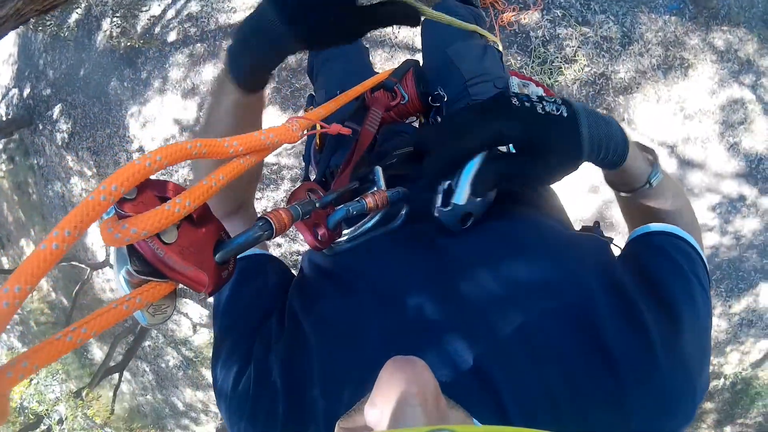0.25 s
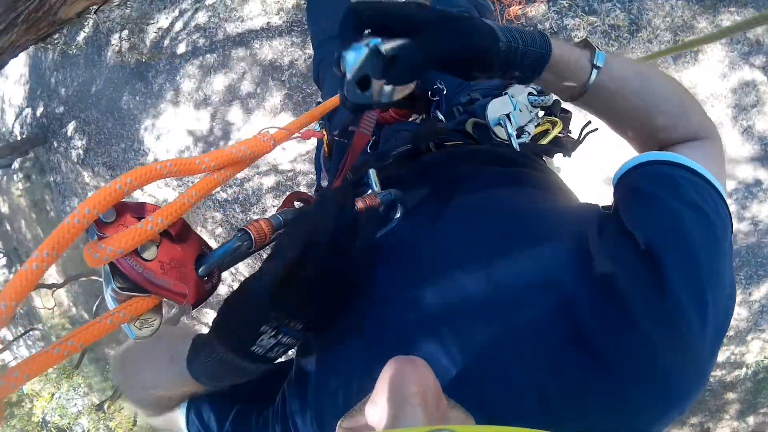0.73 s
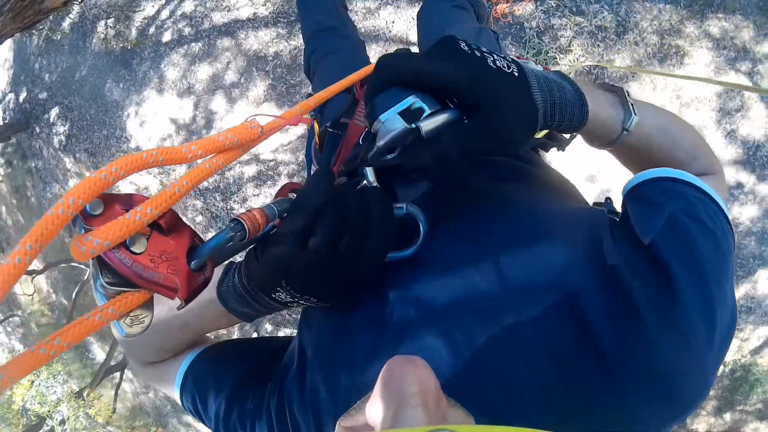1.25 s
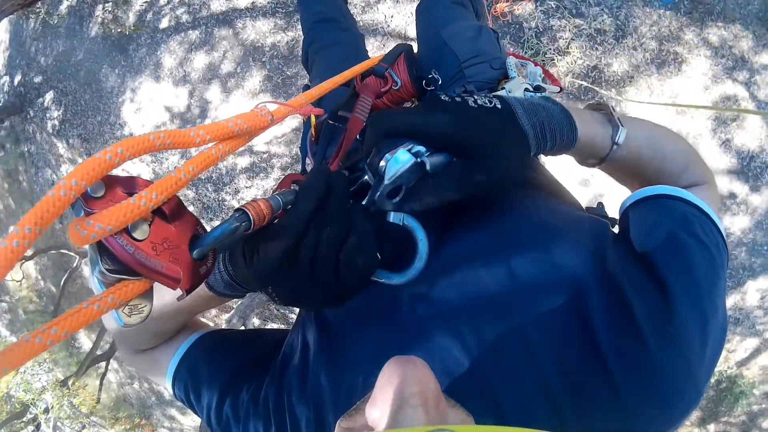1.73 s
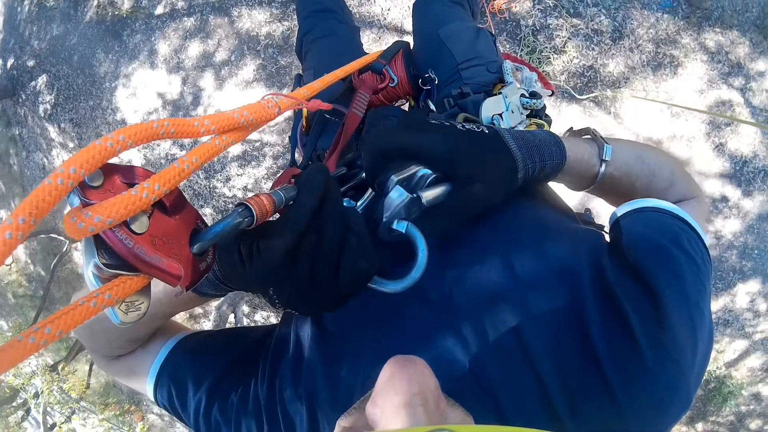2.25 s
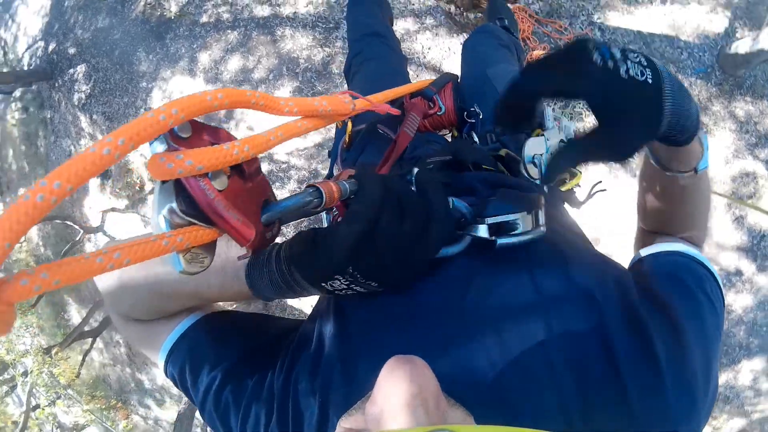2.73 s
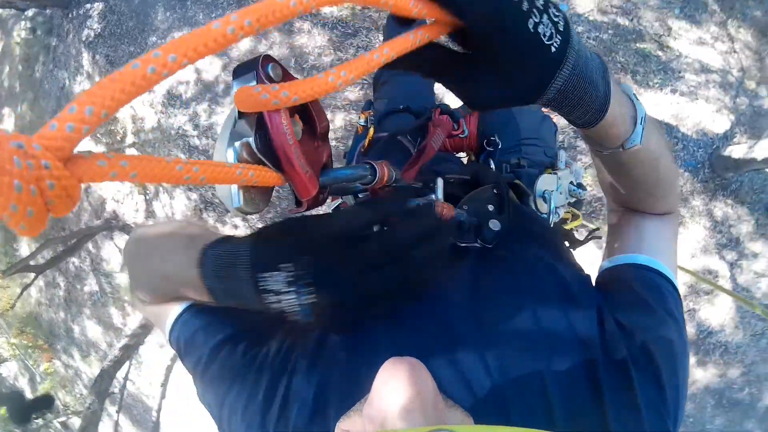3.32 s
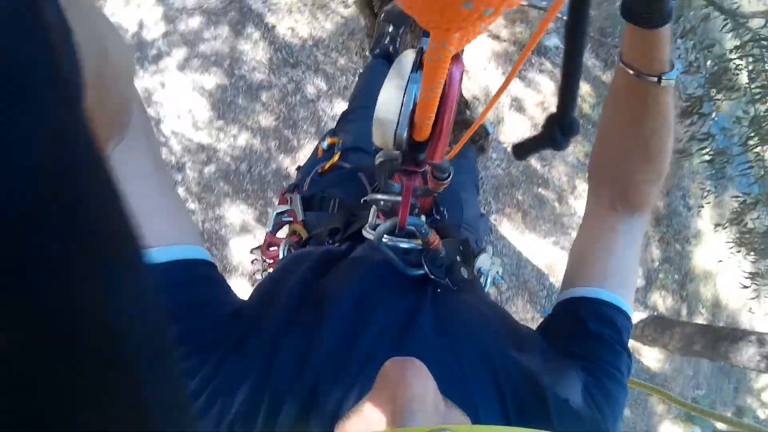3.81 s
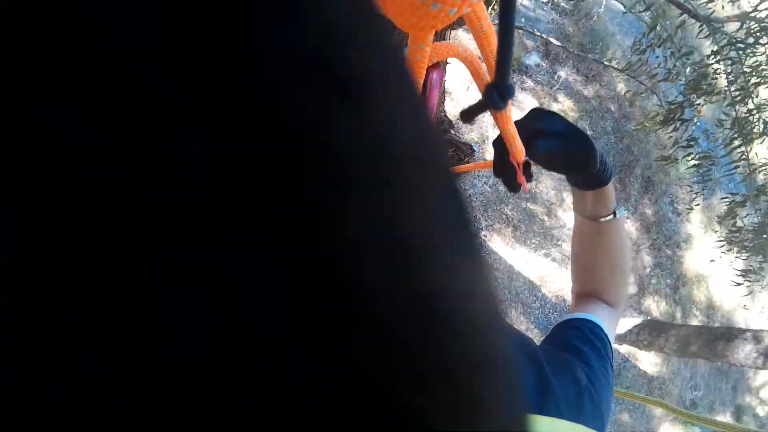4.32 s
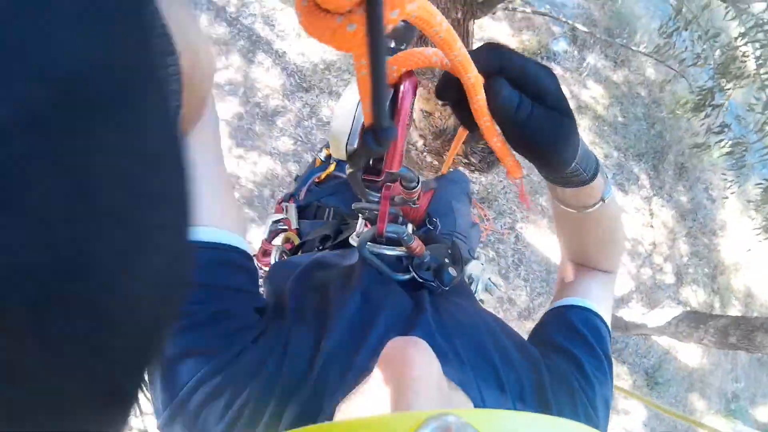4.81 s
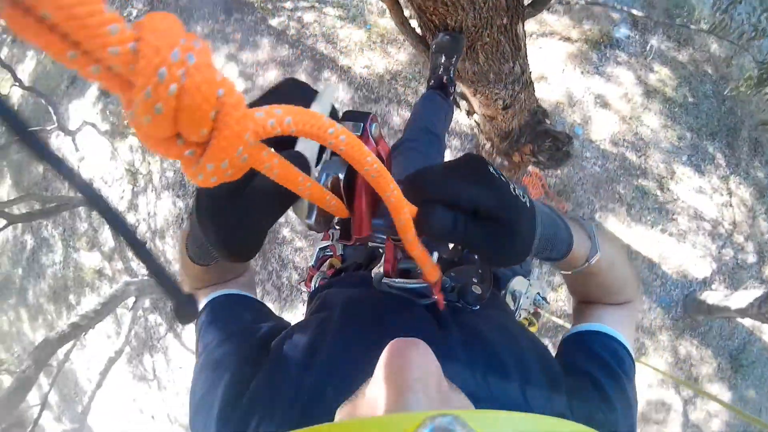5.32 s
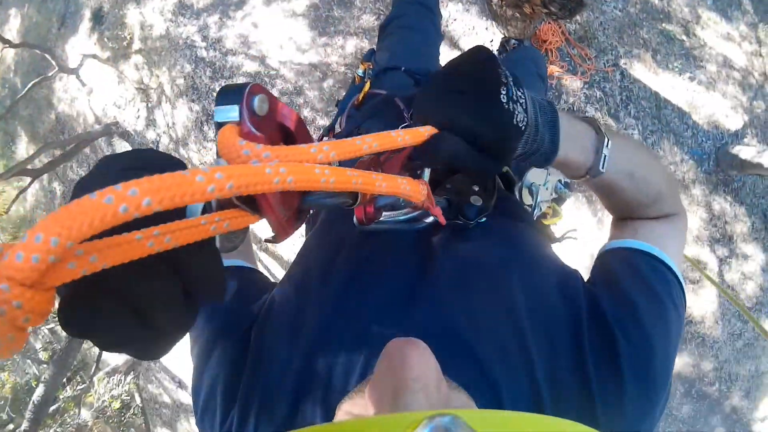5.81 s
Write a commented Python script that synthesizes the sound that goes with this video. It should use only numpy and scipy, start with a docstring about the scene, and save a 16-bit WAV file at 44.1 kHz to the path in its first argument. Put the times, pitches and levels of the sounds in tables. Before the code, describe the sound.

Close, dry carabiner clicks grow into padded clunks, with cloth scraping, one loud rope slap on the helmet, then quiet outdoor air.

```python
"""Still air and microphone hiss run throughout, under a faint rustle of rope and gloves and scattered metal
knocks and ticks: a climber in a tree handles carabiners and a descender on the harness.
The microphone sits on the helmet; rope slaps the helmet twice, and a sleeve rubs along it in three strokes.
Blows, jolts and chimes are decaying sine modes; rub and rustle are coloured fibre slips; air is coloured noise."""
import sys
import numpy as np
from scipy import signal
from scipy.fft import rfft, irfft, next_fast_len
from scipy.io import wavfile
from scipy.ndimage import uniform_filter1d

SR = 44100
rng = np.random.default_rng(int(sys.argv[2]) if len(sys.argv) > 2 else 0)


def dump_mix(stems):
    """Bounce the given channels to the path in sys.argv[1] as a 16-bit WAV at rate SR."""
    frames = np.atleast_2d(stems).T  # one column per channel
    limited = np.clip(frames, -1, 1)  # hard clip at full scale
    pcm = np.round(limited * 32767).astype(np.int16)
    wavfile.write(sys.argv[1], SR, pcm)


N = 267102


def from_db(db):
    """Decibels to amplitude gain."""
    return 10 ** (np.asarray(db) / 20)


def rms_one(x):
    """Scales to rms 1."""
    return x / np.sqrt(np.mean(x ** 2) + 1e-20)


def in_time(spans):
    """Interpolates dB columns to smoothed gains along time, silent where no span is running."""
    gains = np.zeros((len(spans[0][0]) - 1, N))
    for rows in spans:
        s, *columns_db = np.transpose(rows)
        running = np.arange(int(s[0] * SR), min(int(s[-1] * SR), N))
        span_gains = [from_db(np.interp(running / SR, s, db)) for db in columns_db]
        gains[:, running] = np.maximum(gains[:, running], span_gains)
    return uniform_filter1d(gains, size=200, axis=1)


def follow(gain, at_db, level_db, slope):
    """A gain of level_db where the input gain stands at at_db, moving slope dB per dB with it."""
    return from_db(level_db) * abs(gain / from_db(at_db)) ** slope


def colour(x, spectrum):
    """Shapes a noisy signal by a spectrum in dB per Hz, interpolated over log frequency; rms 1."""
    size = next_fast_len(N)
    hz, db = np.transpose(spectrum)
    bins_hz = np.maximum(np.arange(size // 2 + 1) * SR / size, 1)
    gain = from_db(np.interp(np.log(bins_hz), np.log(hz), db))
    return rms_one(irfft(rfft(x, size) * gain, size)[:N])


def drift(rate_hz):
    """Slow chance: noise through a two-pole lowpass, rms 1."""
    r = np.exp(-2 * np.pi * rate_hz / SR)
    noise = rng.standard_normal(N + SR)
    return rms_one(signal.lfilter([1], [1, -2 * r, r * r], noise)[SR:])   # first second settles the filter


def grains(per_s, spread_db):
    """Random slips of fibres: sparse impulses of either sign, uneven in size."""
    sizes = from_db(spread_db * np.minimum(rng.exponential(1, N), 5)) * rng.choice([-1, 1], N)
    return sizes * (rng.random(N) < per_s / SR)


def ring(at_s, strengths, hz, t60_s, rise_cycles):
    """Blows set a decaying sine ringing; a soft contact lets it swell over its first cycles."""
    clicks = np.full(N, 1e-18)   # tiny offset avoids denormals
    np.add.at(clicks, np.round(at_s * SR).astype(int), strengths)
    w = 2 * np.pi * hz / SR
    decay = from_db(-60 / (t60_s * SR))
    swell = np.exp(-hz / (rise_cycles * SR))
    mode = [0, np.sin(w), 0, 1, -2 * decay * np.cos(w), decay ** 2]
    contact = [1 - swell, 0, swell - 1, 1, -2 * swell * np.cos(w), swell ** 2]
    return signal.sosfilt([mode, contact], clicks)


def strike(at_s, levels_db, families, spread_db, rise_cycles, sides=(-1, 1)):
    """Each blow strikes every mode with a strength of its own; successive modes swing in opposition."""
    side = rng.choice(sides, size=len(at_s))
    out = np.zeros(N)
    for family, level_db in zip(families, levels_db):
        for hz, mode_db, t60_s in family:
            side = -side
            chance_db = spread_db * rng.standard_normal(len(at_s))
            strengths = side * from_db(level_db + mode_db + chance_db)
            out += ring(at_s, strengths, hz, t60_s, rise_cycles)
    return out


# Spectrum of still air and microphone hiss. Each row: frequency in Hz, relative density in dB per Hz.
AIR_SPECTRUM = [(15, -22), (30, -4.5), (130, -3.5), (230, -5), (500, -10.5), (750, -12), (1100, -18),
                (2200, -25.5), (5000, -28.5), (15000, -28.5)]
AIR_DB = -60


def air():
    """Steady coloured noise for still air and microphone hiss."""
    return from_db(AIR_DB) * colour(rng.standard_normal(N), AIR_SPECTRUM)


# Rustle of rope and gloves, by how busy the hands are, in three spans. Each row: time in seconds, level in dB.
RUSTLE_SPANS = [
    [(0, -79), (.35, -66.5), (.7, -83), (1.3, -73), (2.0, -62.5), (2.25, -72.5), (2.35, -58.5), (2.45, -66),
     (2.6, -60.5), (2.7, -53), (2.8, -73), (2.9, -51), (2.97, -64.5), (3.2, -66), (3.33, -55), (3.45, -65),
     (3.6, -65), (3.8, -59.5), (3.94, -47)],
    [(4.43, -63), (4.47, -50), (4.61, -65)],
    [(4.85, -64.5), (5.1, -68.5), (5.3, -62.5), (5.75, -69), (6.06, -82)],
]
# Dull part of the rustle. Each row: frequency in Hz, relative density in dB per Hz.
RUSTLE_DULL_SPECTRUM = [(200, -20.5), (450, -5.5), (750, 3), (1000, -10.5), (1400, -38)]
# Scuffing part of the rustle. Each row: frequency in Hz, relative density in dB per Hz.
RUSTLE_SCUFF_SPECTRUM = [(900, -14), (1300, -1), (2150, 0), (2700, -12), (4000, -18.5), (7000, -37)]
SCUFF_DB, SCUFF_DB_PER_DB = -76, 1.35   # level at a rustle of -65 dB; slope against rustle


def rustle():
    """Sparse fibre slips of rope through gloves; busier hands scuff more."""
    dull, = in_time(RUSTLE_SPANS)
    scuff = follow(dull, -65, SCUFF_DB, SCUFF_DB_PER_DB)
    slips = from_db(3.5 * drift(rate_hz=25.0)) * grains(per_s=1500, spread_db=0.5)
    return dull * colour(slips, RUSTLE_DULL_SPECTRUM) + scuff * colour(slips, RUSTLE_SCUFF_SPECTRUM)


# Meetings of metal parts. Each row: start in seconds, padded body level before pitch loss in dB,
# struck pitch in Hz, metal level in dB, softness as loss in the tick modes in dB.
KNOCK_EVENTS = [(0.1014, -70, 680, -52.5, 24), (0.1164, -64, 815, -57, 16), (0.2326, -55.5, 710, -45, 19),
                (0.2853, -62, 1290, -51.5, 22), (0.4104, -41, 606, -63, 10), (0.4284, -56, 710, -54.0, 12),
                (0.6163, -54.5, 790, -49, 24), (1.069, -65, 580, -54, 12), (1.4331, -51.5, 1090, -44, 26),
                (1.5176, -55, 1080, -47, 15.5), (1.6439, -51, 920, -51, 11.0),
                (1.7453, -45.5, 634, -42.5, 34), (1.8524, -46, 615, -48.5, 20), (1.8828, -59, 550, -56, 14),
                (1.936, -45, 970, -52, 12), (1.9604, -52, 1060, -50.5, 11), (2.0073, -46, 1110, -38.5, 24),
                (2.0236, -49, 580, -54.0, 18), (2.294, -37, 960, -41.5, 13), (2.3358, -54, 1220, -68, 11),
                (2.367, -55, 810, -49, 14), (2.3764, -49.5, 750, -64, 16), (2.4019, -41.5, 900, -36, 23),
                (2.493, -57, 1050, -54.5, 8.5), (2.5967, -34.5, 1200, -26.5, 24),
                (2.6, -39, 670, -51.5, -1), (2.6724, -45, 950, -52, 16.5), (2.7174, -49, 814, -40, 27),
                (2.7233, -53, 1280, -31.5, 32), (2.753, -55, 550, -45.5, 28), (2.821, -55, 610, -47, 26),
                (2.8515, -63, 1060, -54.0, 17), (2.8717, -46.5, 590, -41, 22), (2.885, -50, 970, -44.5, 25),
                (2.8968, -55, 920, -32, 29), (2.9192, -48.5, 1280, -46.5, 15), (3.005, -56, 750, -45.0, 18),
                (3.1512, -71, 890, -51, 18.0), (3.2241, -42.5, 820, -43.0, 28),
                (3.2284, -41.5, 690, -58, 3), (3.3212, -35, 750, -52.0, 14.5),
                (3.3441, -46.5, 715, -49, 22), (3.3717, -58, 790, -53, 15), (3.64, -34, 1230, -30, 37),
                (3.6445, -38, 554, -35, 19.5), (3.6526, -27.5, 594, -40, 23),
                (3.6666, -23.5, 1430, -31, 35), (3.6737, -25.5, 800, -41, 15),
                (3.7246, -36.5, 890, -38, 25), (3.7304, -39, 750, -55, 9), (3.818, -41.5, 750, -59.0, 10),
                (3.8322, -19.5, 610, -38, 16), (3.8375, -24, 670, -48, 13), (3.8496, -34.5, 610, -38.5, 10),
                (3.8642, -36, 567, -65, 10), (3.895, -32, 580, -46.0, 18.5), (3.904, -21.5, 945, -27, 27),
                (3.9116, -31, 655, -37, 18), (3.92, -45, 460, -63, 1), (4.2134, -38, 610, -52, 19),
                (4.2351, -33, 630, -34.5, 19), (4.2554, -37, 476, -56, 9.0), (4.724, -38, 540, -57, 7.0),
                (4.7277, -36, 710, -36.5, 13.5), (4.751, -28, 476, -41, 16), (4.783, -37, 624, -37, 14),
                (5.2674, -53.5, 980, -52, 19), (5.3047, -51, 1130, -46, 20), (5.7062, -66, 680, -49.5, 26)]
# Modes of helmet and gear by family. Each row: frequency in Hz, relative level in dB, t60 in seconds.
CLANK_MODES = [(1808, -2, 0.0047), (2149, -9, 0.0051)]
THUD_MODES = [(285, 3.5, 0.01), (408, 5.5, 0.02), (528, 6, 0.011)]
KNOCK_MODES = [(733, 1.5, 0.018), (930, 2, 0.011)]
CLACK_MODES = [(1318, 1.5, 0.0098), (1520, 2.3, 0.014)]
TICK_MODES = [(2726, 7, 0.0042), (3804, 5, 0.0029), (4560, 2, .005)]
GLINT_MODES = [(5410, 4.5, 0.0045), (7900, 2.5, .004), (10100, 1, 0.0033)]
AWAY_DB_PER_OCTAVE = 15.5   # loss of body families away from the struck pitch
GLINT_SOFTNESS = 1.67   # glint loss in dB per dB of softness


def knocks(bounce_s, bounce_db):
    """Metal parts meet against the padded harness and bounce once."""
    s, body_db, pitch_hz, metal_db, soft_db = np.transpose(KNOCK_EVENTS)

    def body_family_db(family):
        """Body level less the loss for the family's mean distance in octaves from the struck pitch."""
        octaves = np.mean([np.log2(hz / pitch_hz) for hz, *_ in family], axis=0)
        return body_db - AWAY_DB_PER_OCTAVE * abs(octaves)

    thud_db, knock_db, clack_db = map(body_family_db, (THUD_MODES, KNOCK_MODES, CLACK_MODES))
    tick_db = metal_db - soft_db
    glint_db = metal_db - GLINT_SOFTNESS * soft_db
    first_db = [metal_db, thud_db, knock_db, clack_db, tick_db, glint_db]
    bounce_at_s = s + bounce_s * rng.uniform(0.572, 1.576, size=len(s))
    at_s = np.concatenate([s, bounce_at_s])
    both_db = np.hstack([first_db, np.add(first_db, bounce_db)])
    families = CLANK_MODES, THUD_MODES, KNOCK_MODES, CLACK_MODES, TICK_MODES, GLINT_MODES
    return strike(at_s, both_db, families, spread_db=4.0, rise_cycles=1.0)


# Two rope slaps, each a quick run of bursts; the second swells in from a softer onset.
# Each row: time in seconds, then helmet, clank, tick and glint levels in dB.
SLAP_BURSTS = [
    [(.3948, -16.5, -17, -40.5, -57), (.3972, -17.5, -18, -36, -43.5), (.399, -26.5, -36, -41, -59),
     (.402, -38, -28, -46, -59)],
    [(4.4728, -15, -41, -42, -59.5), (4.4748, -1.5, -25, -25.5, -48), (4.4765, -9.5, -13.5, -8, -33.5),
     (4.4779, -20, 8.5, -16, -27), (4.4806, -27.5, -15, -31, -18.5)],
]
# Where each slap lands. Each row: boom, shell, knock and clack in dB against helmet, spark in dB against clank.
SLAP_PLACES_DB = [(1.5, -4.5, -0.5, -4.5, -48), (-8.5, -5, -8.5, -18.5, -32.5)]
# More modes woken by a slap. Each row: frequency in Hz, relative level in dB, t60 in seconds.
BOOM_MODES = [(223, 1.5, 0.028), (370, 5, 0.016)]
SHELL_MODES = [(547, 1, 0.03)]
SPARK_MODES = [(13500, 8, .003)]


def slaps():
    """Rope hits the helmet right beside the microphone; all bursts push the helmet the same way."""
    families = (CLANK_MODES, BOOM_MODES, SHELL_MODES, KNOCK_MODES,
                CLACK_MODES, TICK_MODES, GLINT_MODES, SPARK_MODES)
    out = np.zeros(N)
    for bursts, (boom, shell, knock, clack, spark) in zip(SLAP_BURSTS, SLAP_PLACES_DB):
        s, helmet, clank, tick, glint = np.transpose(bursts)
        levels_db = (clank, helmet + boom, helmet + shell, helmet + knock,
                     helmet + clack, tick, glint, clank + spark)
        out += strike(s, levels_db, families, spread_db=1.44, rise_cycles=0.66, sides=(1,))
    return out


# Deep bumps of the helmet. Each row: start in seconds, frequency in Hz, level in dB, t60 in seconds.
JOLT_EVENTS = [(0.395, 130, -26, 0.025), (3.828, 85, -28, 0.036), (3.861, 91, -38.5, 0.23),
               (3.89, 184, -30.5, 0.066), (3.901, 55.3, -35, .1), (4.215, 43.5, -37, .12),
               (4.476, 33.5, -21.5, 0.071), (4.49, 39.7, -42.5, 0.4), (4.75, 60, -48, 0.1)]


def jolts():
    """The shaken helmet pushes the microphone: low, decaying sines."""
    return sum(ring(np.array([s]), from_db(db), hz, t60_s, rise_cycles=0.12)
               for s, hz, db, t60_s in JOLT_EVENTS)


# Longer thin rings of the gear. Each row: frequency in Hz, t60 in seconds.
CHIME_MODES = [(430, .07), (675, .1), (840, .09), (1760, .44), (2256, .11), (2756, .13), (3854, .11)]
# Rings woken by a few of the blows. Each row: start in seconds, frequency of the woken ring in Hz, level in dB.
CHIME_EVENTS = [(.399, 675, -32), (.399, 840, -70), (.399, 1760, -64.5), (3.647, 430, -60),
                (3.674, 430, -44), (3.674, 840, -35), (3.673, 2756, -54), (3.728, 675, -39),
                (4.479, 1760, -45.5), (4.48, 2256, -43), (4.479, 2756, -45.5), (4.786, 3854, -58)]


def chimes():
    """Thin metal rings on after a few of the blows, each row waking the nearest mode."""
    s, woken_hz, db = np.transpose(CHIME_EVENTS)
    nearest = np.argmin([abs(np.log(woken_hz / hz)) for hz, _ in CHIME_MODES], axis=0)
    out = np.zeros(N)
    for k, (hz, t60_s) in enumerate(CHIME_MODES):
        out += ring(s, from_db(db) * (nearest == k), hz, t60_s, rise_cycles=2.5)
    return out


# Three sleeve strokes. Each row: time in seconds, pressure as body level in dB,
# roughness as rasp against body in dB.
RUB_STROKES = [
    [(3.935, -40, -11), (3.951, -48, -7.5), (4.015, -34, -13.5), (4.024, -35, -9.5), (4.038, -32, -13.5),
     (4.064, -30.5, -8), (4.078, -39.5, -6), (4.12, -37.5, -7), (4.15, -34.5, -0.5), (4.166, -34.5, -5.5),
     (4.184, -35, -3.5), (4.2, -49, -7)],
    [(4.2, -43, -23), (4.22, -47, -1.5), (4.244, -43, -7), (4.29, -43.5, -7.5), (4.328, -47, -11.5),
     (4.372, -44, -23.5), (4.4, -59.5, -1), (4.422, -49, -23), (4.45, -53, -26)],
    [(4.6, -52, -16), (4.638, -58, -17), (4.706, -52, -10.5), (4.72, -47.5, -14), (4.726, -63, 10),
     (4.75, -41, -9.5), (4.779, -39.5, 0.5), (4.785, -34, -2.5), (4.806, -55, -19), (4.86, -60, -9)],
]
# Spectra of the rubbed body, rasp and hiss. Each row: frequency in Hz, relative density in dB per Hz.
RUB_BODY_SPECTRUM = [(88, -46), (150, -13), (445, 1), (682, -1), (744, -7), (901, -5.5), (1200, -17.5),
                     (1560, -41), (2640, -120)]
RUB_RASP_SPECTRUM = [(650, -27.5), (1100, -6.5), (1260, -4.5), (1550, 3.5), (1860, -6.5), (2060, 3.5),
                     (2510, -10.5), (3080, -8), (3220, -7), (3480, -13), (3820, -5.5), (4800, -21.5),
                     (6240, -39), (10600, -120)]
RUB_HISS_SPECTRUM = [(4000, -12), (4800, -13), (6000, -13), (8000, -20), (11000, -25), (14000, -42)]
HISS_DB, HISS_DB_PER_DB = -58.5, 1.116   # level at a rasp of -40 dB; slope against rasp
RUMBLE_DB, RUMBLE_DB_PER_DB = -55, 0.4   # level at a body of -40 dB; slope against body


def rub():
    """Cloth sticks and slips in lumps: a dull body, a rasp, a hiss and a rumble of the shaken microphone."""
    body, roughness = in_time(RUB_STROKES)
    rasp = body * roughness
    hiss = follow(rasp, -40, HISS_DB, HISS_DB_PER_DB)
    rumble = follow(body, -40, RUMBLE_DB, RUMBLE_DB_PER_DB)
    lumps = drift(rate_hz=60.0)
    slips = grains(per_s=2900, spread_db=1.5)

    def lumpy(depth_db, spectrum):
        """Coloured slips, swelling with the shared lumps; rms 1."""
        return rms_one(from_db(depth_db * lumps) * colour(slips, spectrum))

    low_band = signal.butter(2, [50, 200], "band", fs=SR, output="sos")
    low = signal.sosfilt(low_band, rng.standard_normal(N))
    return (body * lumpy(2.2, RUB_BODY_SPECTRUM)
            + rasp * lumpy(0.85, RUB_RASP_SPECTRUM)
            + hiss * lumpy(1.4, RUB_HISS_SPECTRUM)
            + rumble * rms_one(low))


def scene():
    """Gear, rope and sleeve over the steady air; one channel."""
    gear = knocks(bounce_s=0.002355, bounce_db=3.5) + slaps() + chimes()
    return (air() + rustle() + gear + jolts() + rub())[None]


OVERLOAD = 1.0   # input limit, full scale
CUTOFF_HZ = 15600   # lowpass is 60 dB down from here up


def record(dry):
    """Input clips flat at its limit; a steep lowpass cuts the top."""
    flat = np.clip(dry, -OVERLOAD, OVERLOAD)
    lowpass = signal.cheby2(16, 60, CUTOFF_HZ, fs=SR, output="sos")
    return signal.sosfilt(lowpass, flat)


dry = scene()
out = record(dry)
dump_mix(out)
```